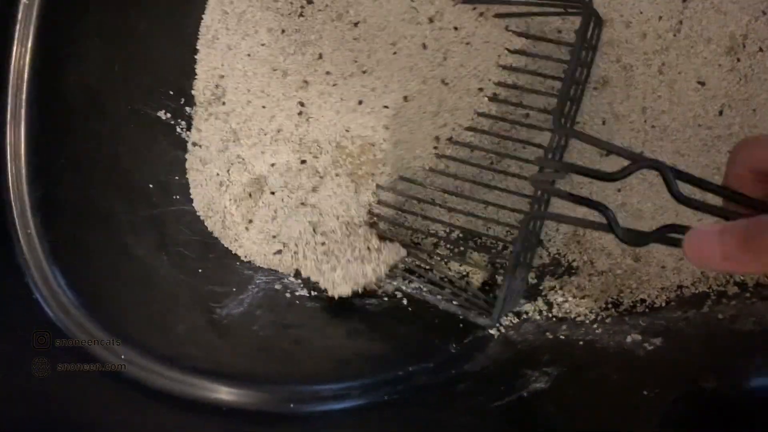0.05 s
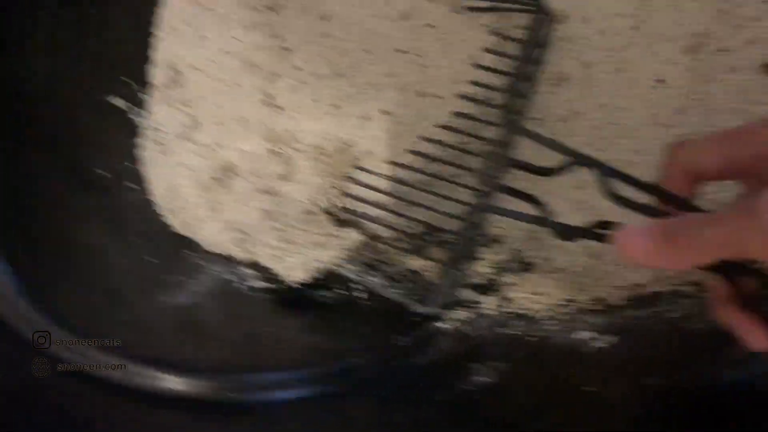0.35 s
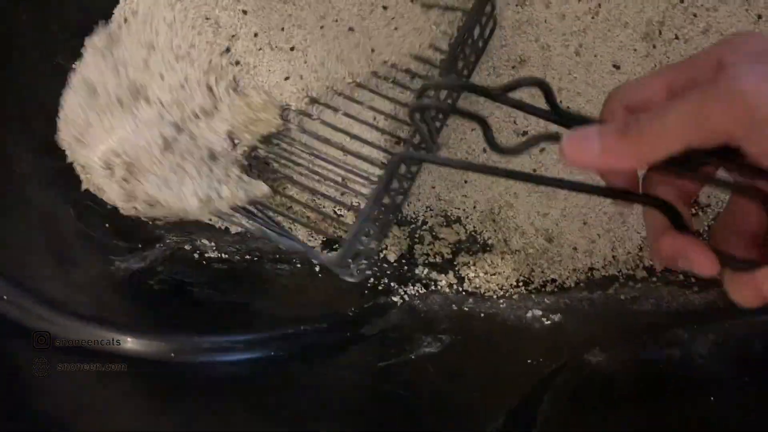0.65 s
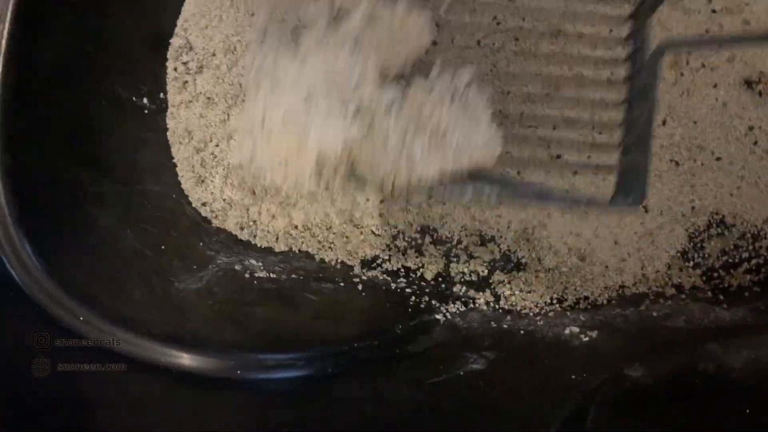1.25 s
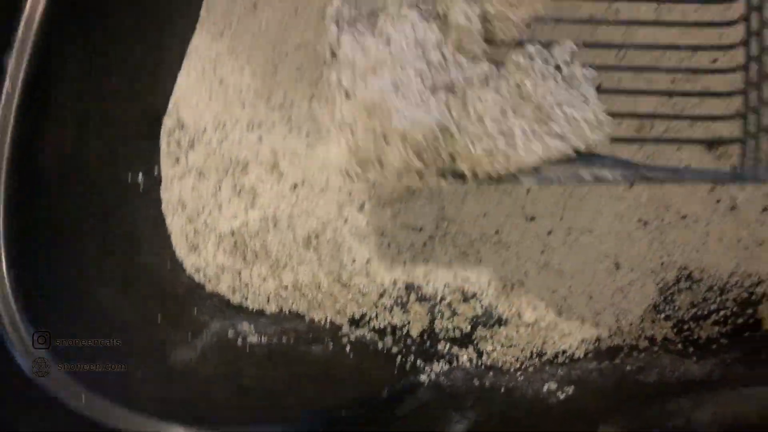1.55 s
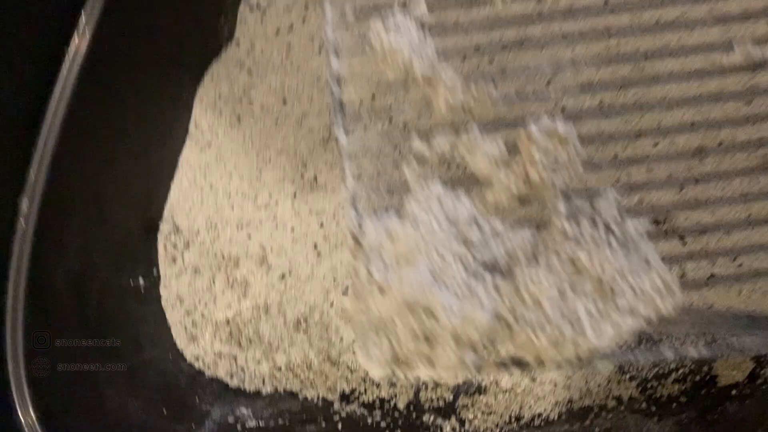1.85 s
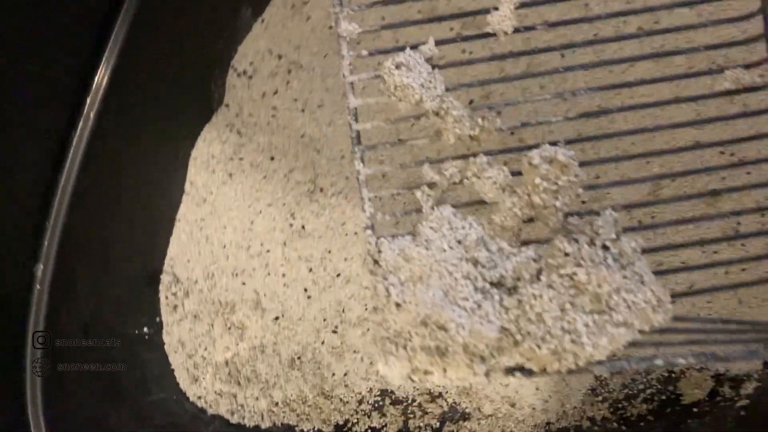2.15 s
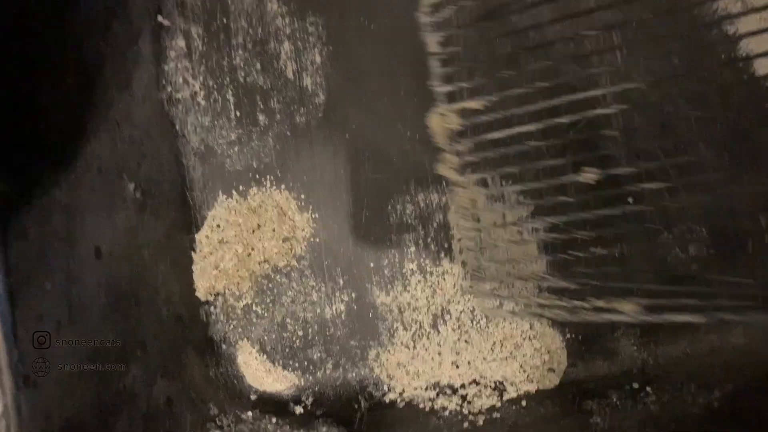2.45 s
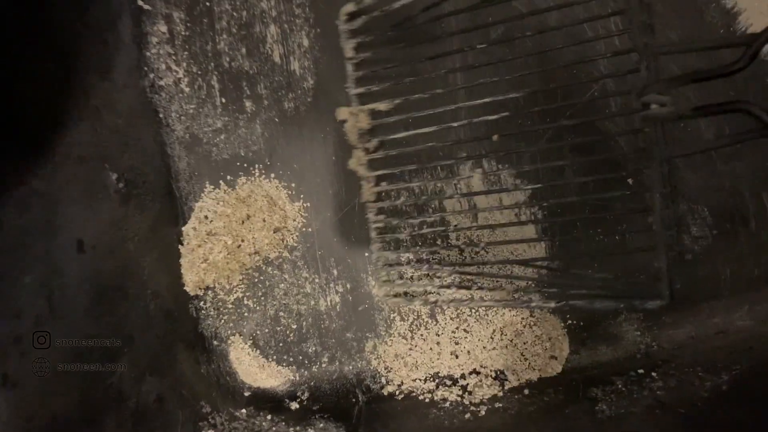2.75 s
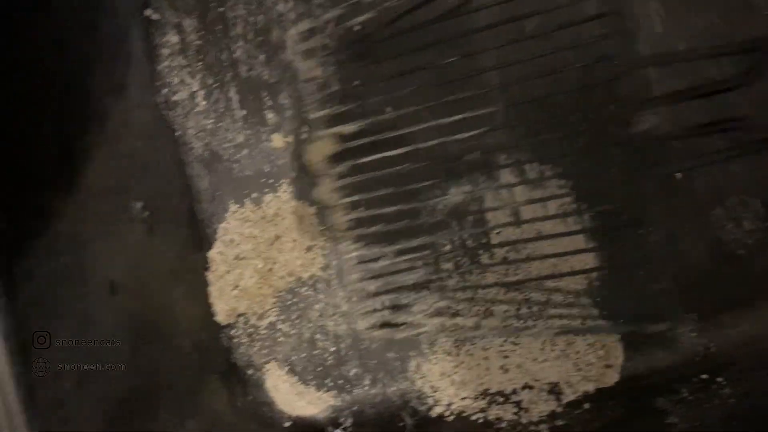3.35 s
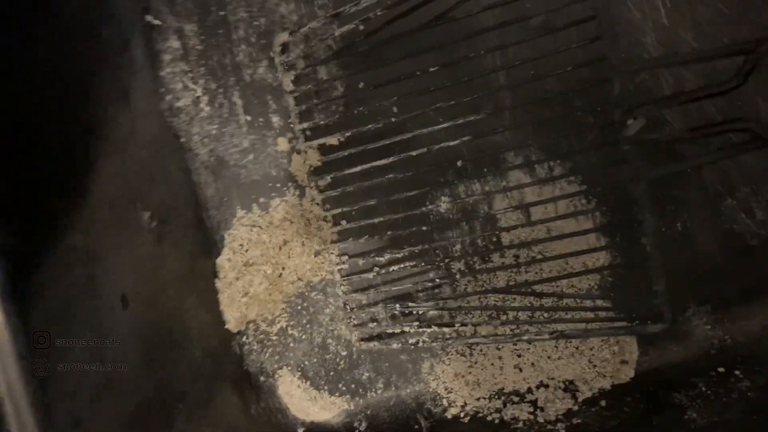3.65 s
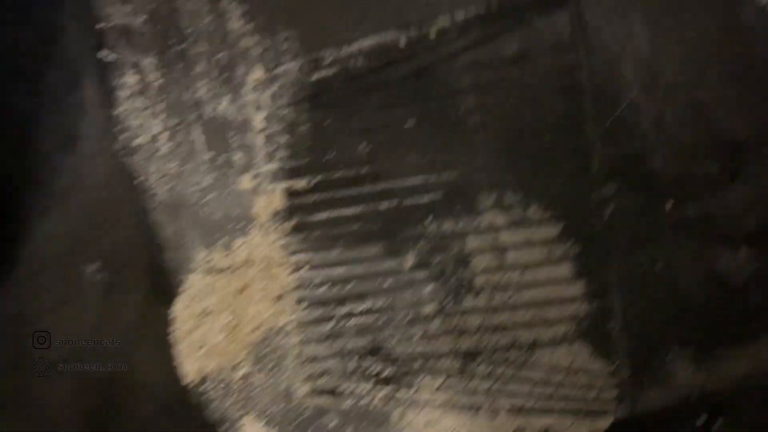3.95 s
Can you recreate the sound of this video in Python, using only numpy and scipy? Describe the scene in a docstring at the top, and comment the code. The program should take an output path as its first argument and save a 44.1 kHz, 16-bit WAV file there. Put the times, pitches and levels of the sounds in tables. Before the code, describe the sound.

A wire scoop crunches into cat litter for the first 0.6 seconds, cracking clumps as the plastic tray booms softly. Grains then patter quietly through the wires, fading by about 2 seconds. From 2.5 seconds the scoop scrapes the bare tray in short rasping strokes, with a bright crackle of crust near 3 seconds, then wire ticks and hollow knocks until about 4. A faint room hum lies underneath.

```python
"""Scooping cat litter

A wire scoop digs into litter in a plastic tray, crushing grains and cracking clumps. The load sifts
through the wires, then the scoop scrapes the bare floor in short strokes, and a stuck crust gives way
with a bright chatter. Grains and slips of the wire edge make the tray ring, in a small humming room."""
import sys
import numpy as np
from scipy import signal
from scipy.fft import rfft, irfft
from scipy.io import wavfile

SR = 44100
rng = np.random.default_rng(int(sys.argv[2]) if len(sys.argv) > 2 else 0)


def unload_wav(signal):
    """Save mono or channel-first audio to the path in sys.argv[1] as 16-bit WAV at rate SR, clipped to [-1, 1]."""
    wavfile.write(
        sys.argv[1],
        SR,
        np.round(np.clip(np.atleast_2d(signal).T, -1, 1) * 32767).astype(np.int16),
    )


N = 176400
T = np.arange(N) / SR
SIZE = 16384  # samples in a response, the sound that one sharp tap leaves behind
FREQ = np.maximum(np.arange(SIZE // 2 + 1) * SR / SIZE, 1)

# The tone of crunching litter, hissing grit and the booming tray. Each row: frequency in Hz, level in dB.
CRUNCH_TONE = [(150, -22.5), (400, -6), (680, -0.5), (850, -6), (1500, -7), (2200, -11), (3000, -13),
               (5000, -19), (8000, -23), (16000, -49)]
GRIT_TONE = [(1500, -35.5), (3500, -19.5), (5200, -1.5), (6800, 9), (8200, 8.5), (10500, 4), (12500, -1),
             (16000, 0)]
BOOM_TONE = [(22, -36), (36, -8), (45, 1), (57, 1), (80, -8), (135, -2), (175, -11), (250, -6), (310, -2),
             (400, -13), (800, -30), (3000, -60)]
# The wire edge jumps on the tray floor.
# Each row: time in seconds, relative levels of scoop ring and tray knock in dB, knock pitch in Hz.
EDGE_SLIPS = [(2.538, -33.5, -29.5, 266), (2.599, -24.5, -39, 302), (2.958, -12, -27.5, 550),
              (3.224, -48, -32, 568), (3.269, -58, -42, 545), (3.395, -18.5, -30, 536),
              (3.402, -27, -20.5, 239), (3.453, -22, -29.5, 547), (3.557, -22, -35, 576),
              (3.589, -22, -34, 297), (3.628, -24, -20.5, 597), (3.686, -21.5, -25.5, 580),
              (3.784, -18, -42, 550), (3.829, -18.5, -37, 306), (3.858, -30, -23, 290),
              (3.907, -18.5, -50, 550), (3.938, -20, -54, 297)]


def undb(db):
    """Turns decibels into a gain to multiply by."""
    return 10 ** (np.asarray(db) / 20)


def unit(response):
    """Scales a response to an energy of 1."""
    return response / np.sqrt(np.sum(response ** 2))


def through(sound, response):
    """Plays a sound through a response."""
    return signal.fftconvolve(sound, response)[:N]


def over_hz(points):
    """Joins points into a curve over frequency, with every octave equally wide."""
    hz, value = np.array(points, float).T
    return np.interp(np.log(FREQ), np.log(hz), value)


def colour(tone):
    """A response with the given tone."""
    cepstrum = irfft(np.log(undb(over_hz(tone))))
    cepstrum[1:SIZE // 2] *= 2  # folding onto the first half puts the energy right after the tap
    cepstrum[SIZE // 2 + 1:] = 0
    return unit(irfft(np.exp(rfft(cepstrum))))


def decay(ring_s):
    """A fade that falls by 60 dB in the ring time."""
    return np.exp(-np.log(1000) * T[:SIZE] / ring_s)


def ring(modes):
    """The response of a struck object: its modes, or natural tones, each die away."""
    return unit(sum(undb(db) * unit(np.sin(2 * np.pi * hz * T[:SIZE]) * decay(ring_s))
                    for hz, ring_s, db in modes))


def gains(rows):
    """One gain curve for each level column, silent before the first row and after the last."""
    times, *columns = np.array(rows, float).T
    return [undb(np.interp(T, times, db)) * (T >= times[0]) * (T < times[-1]) for db in columns]


def wander(rate):
    """Drifts around zero, reaching a new random value `rate` times a second."""
    return np.interp(T * rate, np.arange(SIZE), np.clip(rng.standard_normal(SIZE), -2, 2))


def waver(rate, depth_db):
    """A gain that drifts up and down at random."""
    gain = undb(depth_db * wander(rate))
    return gain / np.sqrt(np.mean(gain ** 2))


def grains(rate, spread_db):
    """Tiny random impacts of uneven size, about `rate` each second."""
    hits = rng.random(N) < rate / SR
    sizes = undb(spread_db * np.clip(rng.standard_normal(N), -2, 2))
    impacts = hits * sizes * rng.choice([-1, 1], N)
    return impacts / np.std(impacts)


def bursts(rows, fade_s, rise_s=0.00068):
    """A gain that shoots up and dies away at each (seconds, dB) row."""
    return sum(undb(db) * np.exp(-np.minimum(np.maximum((T - s) / fade_s, (s - T) / rise_s), 20))
               for s, db in rows)


def taps(rows):
    """One sharp tap at each (seconds, dB) row."""
    track = np.zeros(N)
    for s, db in rows:
        track[int(s * SR)] += undb(db)
    return track


def space(sound):
    """Makes stereo: the direct sound, tray-wall echoes that shift as the scoop moves, and room echo."""
    # Each row: frequency in Hz, milliseconds by which the direct sound is later on the right.
    right_lag = [(1400, 0.049), (2500, 0.088), (4200, 0.072), (5100, 0.1), (8200, 0.12), (16000, .127)]
    wall_db, room_db, low_hz, top_hz = -2, -8, 377, 7000
    echo_band = (FREQ / (FREQ - 1j * low_hz)) ** 2 / (1 + 1j * FREQ / top_hz)

    def echo(ring_s):
        reflections = unit(rng.standard_normal(SIZE) * (T[:SIZE] > .0005) * decay(ring_s))
        return through(sound, irfft(echo_band * rfft(reflections)))

    shares = np.array([wander(rate=9) for _ in range(4)])
    shares /= np.sqrt(np.sum(shares ** 2, axis=0))
    channels = []
    for lag_s in (0, over_hz(right_lag) / 1000):
        direct = through(sound, np.roll(irfft(np.exp(-2j * np.pi * FREQ * lag_s)), 10))
        walls = sum(share * echo(ring_s=0.042) for share in shares)
        channels.append(direct + undb(wall_db) * walls + undb(room_db) * echo(ring_s=0.32))
    return np.array(channels) / np.hypot(1, undb(wall_db))


def room():
    """A low rumble and a wavering hum."""
    # The rumble's tone and the hum's notes. Each row: frequency in Hz, relative level in dB.
    rumble_tone = [(20, -20), (45, -7), (75, 0), (125, -5), (160, -9), (240, -14), (310, -21.5), (480, -20),
                   (800, -31), (1400, -39.5), (3000, -53.5), (6000, -56.5), (16000, -57)]
    hum_notes = [(86, -54.5), (129, -50), (236, -60)]
    hum = 0
    for hz, db in hum_notes:
        level = undb(db) * np.sqrt(2) * waver(rate=15, depth_db=1.5)
        pitch = hz * (1 + .025 * wander(rate=25))
        hum += level * np.sin(2 * np.pi * np.cumsum(pitch) / SR)
    return hum + undb(-47) * through(rng.standard_normal(N), colour(rumble_tone))


def sudden_cut(background, cut_s=2.379, drop_db=-6):
    """An effect laid on the background: at a cut, a faint click sounds and the level drops."""
    click = through(taps([(cut_s, -37)]), colour(CRUNCH_TONE))
    return background * undb(drop_db * (T > cut_s)) + click


def sift():
    """Loose grains stream through the wires and patter on the litter below, with a few larger crumbs."""
    # The falling stream. Each row: time in seconds, relative levels of patter and hiss in dB.
    flow = [(.6, -45.5, -53), (.715, -47, -50.5), (.83, -56, -62), (.92, -56, -60.5), (1.06, -55.5, -59.5),
            (1.24, -70, -81.5), (1.46, -64.5, -71.5), (1.62, -64, -72), (1.9, -70, -87.5), (2.2, -94, -97),
            (2.38, -67.5, -91)]
    # Crumbs drop off the scoop. Each row: time in seconds, level in dB.
    drops = [(.704, -34), (.928, -45), (.976, -53), (1.046, -42.5), (1.08, -44.5)]
    # The tone of grains, fine sand and crumbs landing. Each row: frequency in Hz, level in dB.
    patter_tone = [(100, 5), (240, 11.5), (380, -1.5), (520, 6), (800, -0.5), (1400, -2.5), (2200, -2.5),
                   (3500, -9.5), (6000, -19.5), (16000, -55)]
    sand_tone = [(1200, 2.8), (2400, 4.5), (3500, 6.4), (5000, 2.1), (8000, 5.3), (11000, 1.9),
                 (14000, 4.9), (16000, 4)]
    crumb_tone = [(400, -4), (1200, -3), (2300, -1), (3500, -7.5), (5000, -20), (16000, -21)]
    patter, hiss = gains(flow)
    fall = grains(rate=3800, spread_db=3)
    crumbs = through(rng.standard_normal(N) * bursts(drops, fade_s=0.0014), colour(crumb_tone))
    sand = through(fall * hiss * undb(6), colour(sand_tone))
    return crumbs + through(fall * patter, colour(patter_tone)) + sand


def wires():
    """Hard grains tick on the wires and ring them; the crust snaps loose and crackles away."""
    # Grains hit the wires. Each row: time in seconds, relative level in dB, dB added for the ring.
    hits = [(1.116, -43.5, -20), (1.127, -49, -13), (1.841, -48.5, 8), (2.695, -62, -8), (2.94, -14.5, -3),
            (2.943, -18.5, -6), (2.9516, -12, 0), (2.975, -19.5, -3), (3.436, -23.5, -5), (3.55, -33, 14.5),
            (3.73, -21, -10), (3.746, -17.5, -15), (3.784, -22, -1), (3.826, -22, -24), (3.854, -19.5, -14)]
    # The tone of a tick. Each row: frequency in Hz, level in dB.
    tick_tone = [(1000, -32), (1900, 5.5), (2450, -3), (3100, -1.5), (4200, 1), (5400, -3.5), (6600, 1),
                 (8100, 2), (9800, 0.5), (12500, -12.5), (16000, -5)]
    # Natural tones of single wires. Each row: pitch in Hz, ring time in seconds, level in dB.
    wire_modes = [(2400, 0.012, 3), (4340, 0.026, 1), (8180, .12, -18), (9883, 0.13, -22)]
    crust_s, hold_s, fade_s = 2.939, .021, 0.015
    crust_level = undb(-21) * (T >= crust_s) * np.exp(-np.maximum(T - crust_s - hold_s, 0) / fade_s)
    ticks = rng.standard_normal(N) * bursts([(s, db) for s, db, _ in hits], fade_s=0.002) * undb(-0.5)
    crust = grains(rate=1400, spread_db=1) * crust_level
    strikes = taps([(s, db + ring_db) for s, db, ring_db in hits]) * undb(5)
    return through(ticks + crust, colour(tick_tone)) + through(strikes, ring(wire_modes))


def stroke(start, attack, hold, release):
    """The pressure of one push: it rises 20 dB per attack time, holds, then falls 20 dB per release."""
    rising = np.maximum(1 - (T - start) / attack, 0)
    falling = np.maximum(T - start - attack - hold, 0) / release
    return undb(-20 * (rising + falling))


def flexing_tray(push):
    """The pressed tray flexes, so its tones drift; each knock rings those near its own pitch."""
    # Natural tones of the tray. Each row: pitch in Hz, ring time in seconds, level in dB when rubbed.
    tray_modes = [(231.8, 0.22, -5), (257.2, 0.29, -8.5), (300, 0.18, -4), (346, 0.049, -6.5),
                  (529, 0.056, -7), (568, 0.069, -11.5), (690, 0.052, -21), (1065, 0.045, -8.5)]
    bend, drifts_per_s, knock_rise_s, knock_octaves = 0.041, 18, 0.0017, 0.22
    softness = np.exp(-1 / (knock_rise_s * SR))
    sound = 0
    for hz, ring_s, db in tray_modes:
        tone = np.exp(2j * np.pi * np.cumsum(hz * (1 + bend * wander(drifts_per_s))) / SR)
        kept = np.exp(-np.log(1000) / (ring_s * SR))  # share of the ringing left after one sample
        knocks = taps([(s, knock_db - 10 * (np.log2(hz / pitch) / knock_octaves) ** 2)
                       for s, _, knock_db, pitch in EDGE_SLIPS])
        rubbed = push * waver(drifts_per_s, depth_db=2.5) * undb(db) * np.sqrt(2 * (1 - kept ** 2))
        # Divide the tone out, let each impact linger, then multiply the tone back in.
        drive = rubbed / tone + signal.lfilter([1 - softness], [1, -softness], knocks / tone)
        sound += np.imag(tone * signal.lfilter([1], [1, -kept], drive))
    return sound


def scrape():
    """The wire edge sticks and slips over grit; each jump rings the scoop and knocks the tray."""
    # Pushes. Each row: start, attack, hold, release in seconds; relative rasp, grit, tray levels in dB.
    strokes = [(2.539, 0.017, .063, 0.1, -39, -58, -38.5), (2.714, .0016, 0.013, 0.13, -48, -81, -41.5),
               (2.726, .13, 0.088, 0.059, -30, -43.5, -35), (2.947, 0.011, 0.44, 0.64, -49.5, -76.5, -49.5),
               (3.179, 0.083, .02, 0.027, -39, -53.5, -30), (3.334, 0.058, .011, 0.02, -27, -40, -27.5),
               (3.347, 0.018, .02, 0.16, -32, -57.5, -31.5), (3.409, .015, 0.012, 0.029, -34.5, -41.5, -51),
               (3.528, 0.026, 0.077, 0.04, -41, -55.5, -37.5),
               (3.664, 0.018, 0.066, 0.068, -34, -44.5, -36.5), (3.715, 0.03, 0.12, 0.042, -33, -44.5, -40),
               (3.849, 0.015, 0.038, 0.32, -35.5, -48, -41)]
    # The tone of the scraped floor. Each row: frequency in Hz, level in dB.
    rasp_tone = [(200, -31.5), (430, 5), (620, 6), (850, 1.5), (1300, -3.5), (2200, -0.5), (3000, -3.5),
                 (4400, -7), (6000, -24), (16000, -64)]
    # Natural tones of the scoop. Each row: pitch in Hz, ring time in seconds, level in dB.
    scoop_modes = [(1308, 0.036, -6.5), (1427, 0.028, 0.5), (1614, 0.012, -3), (1822, 0.015, -4),
                   (2036, 0.031, 0), (2543, .06, -16.5), (3770, .04, -16)]
    rasp, grit, tray = np.sqrt(sum(np.outer(undb(row[4:]), stroke(*row[:4])) ** 2 for row in strokes))
    grip = waver(rate=140, depth_db=2.5)
    rub = grains(rate=3800, spread_db=3.5) * grip
    rub += grains(rate=160, spread_db=2) * undb(-7)  # coarse grains split under the edge
    slip = rng.standard_normal(N) * bursts([(s, db) for s, db, _, _ in EDGE_SLIPS], fade_s=0.0022)
    push = grains(rate=820, spread_db=3) * grip
    shove = stroke(start=3.76, attack=0.072, hold=.034, release=0.25)  # the whole tray shifts
    boom = through(push * (tray * undb(-17) + shove * undb(-33.5)), colour(BOOM_TONE))
    floor = through(rub * rasp * undb(-2.5) + slip * undb(-14), colour(rasp_tone))
    hiss = through(rub * grit * undb(4), colour(GRIT_TONE))
    scoop = through(rub * rasp * undb(-5.5) + slip * undb(-1.5), ring(scoop_modes))
    return floor + hiss + scoop + flexing_tray(push * tray) + boom


def dig():
    """The scoop crushes packed grains, splits coarse ones and cracks clumps; the loaded tray booms."""
    # The dig. Each row: time in seconds, relative levels of crunch, grit and boom in dB.
    effort = [(0, -35.5, -42.5, -33.5), (.03, -37, -47, -36.5), (.088, -46, -59, -41.5),
              (.12, -30, -43, -34.5), (.15, -29, -37.5, -31.5), (.21, -29.5, -37.5, -31.5),
              (.245, -24, -34.5, -21), (.32, -31.5, -40.5, -31), (.42, -40, -53, -36),
              (.53, -35.5, -44.5, -49.5), (.58, -47.5, -57, -50.5), (.6, -47, -54, -56)]
    # Clumps crack and the edge catches. Each row: time in seconds, relative dB, dB added for the treble.
    cracks = [(.009, -30, 7), (.102, -30, -0.5), (0.1198, -24.5, 2), (.14, -25, -5), (.1478, -17, 0),
              (0.226, -17, -1), (.238, -13, -4), (0.2639, -14, -4), (0.314, -14.5, -8.5),
              (0.337, -19.5, -20), (0.52, -29, -18)]
    crunch, grit, boom = gains(effort)
    crush = grains(rate=6000, spread_db=5) + grains(rate=240, spread_db=0.5) * undb(-5.5)
    snap = rng.standard_normal(N)
    low_cracks = snap * bursts([(s, db + 2.5) for s, db, _ in cracks], fade_s=.002)
    high_cracks = snap * bursts([(s, db + treble) for s, db, treble in cracks], fade_s=0.0011)
    body = through(crush * crunch * undb(-1.5) + low_cracks, colour(CRUNCH_TONE))
    edge = through(crush * grit * undb(3.5) + high_cracks, colour(GRIT_TONE))
    tray = through(grains(rate=2300, spread_db=3.5) * boom * undb(2), colour(BOOM_TONE))
    return body + edge + tray


def scene():
    """Digging, sifting and scraping in the room, all a little to the right."""
    def place(sound, right_db):
        return space(sound) * undb(np.array([[-right_db], [right_db]]) / 2)

    return place(dig(), 1.4) + place(scrape(), 1.5) + place(sift() + wires() + sudden_cut(room()), 0.8)


def record(dry):
    """Rounds off the loudest peaks and cuts the highest treble."""
    ceiling, top_hz = 0.95, 16000
    rounded = ceiling * np.tanh(dry / ceiling)
    return signal.sosfilt(signal.ellip(10, .2, 80, top_hz, fs=SR, output="sos"), rounded)


dry = scene()
out = record(dry)
unload_wav(out)
```